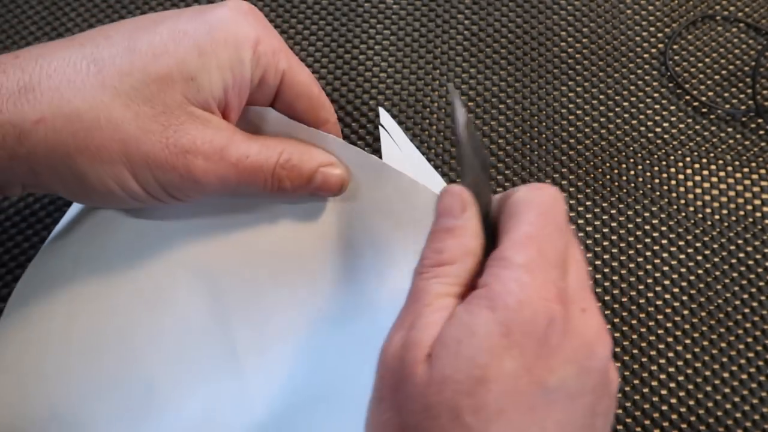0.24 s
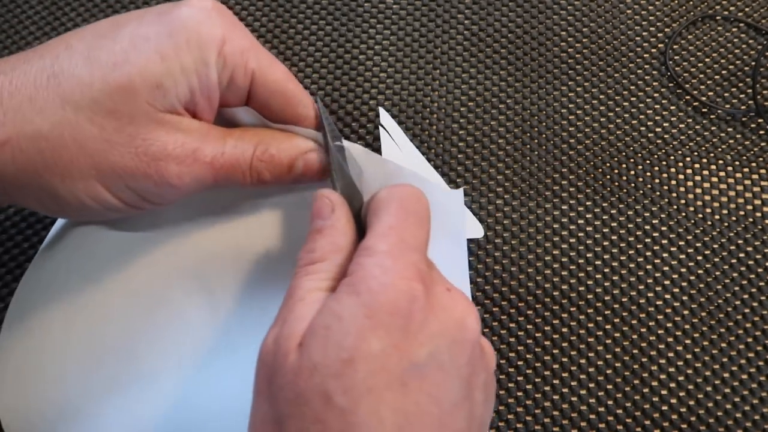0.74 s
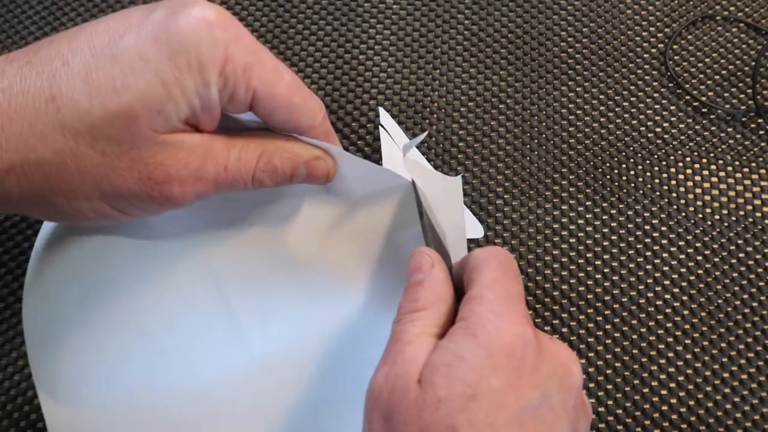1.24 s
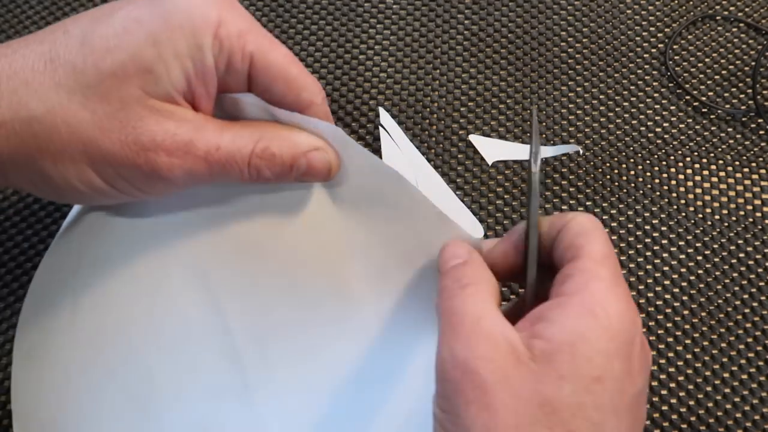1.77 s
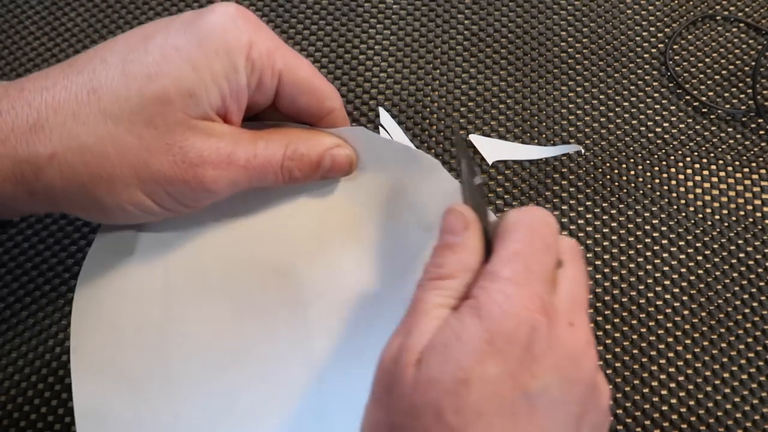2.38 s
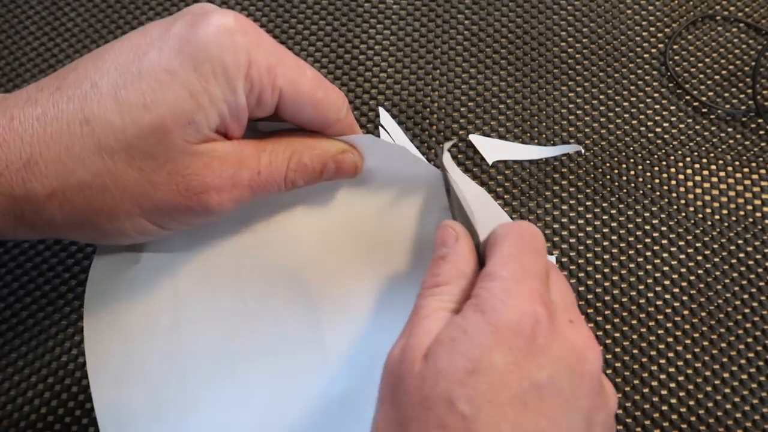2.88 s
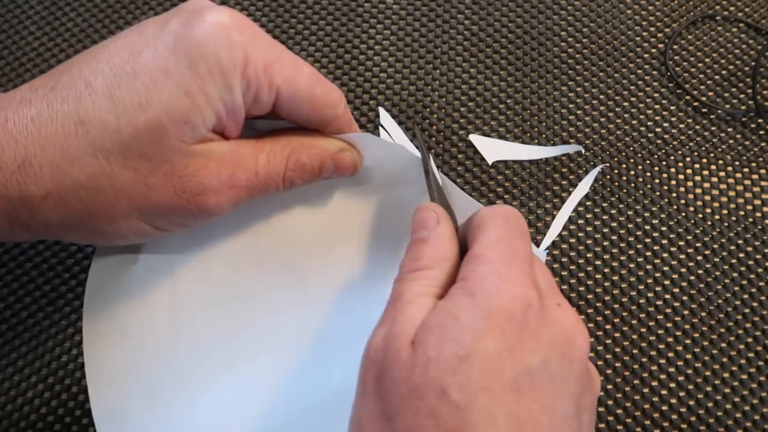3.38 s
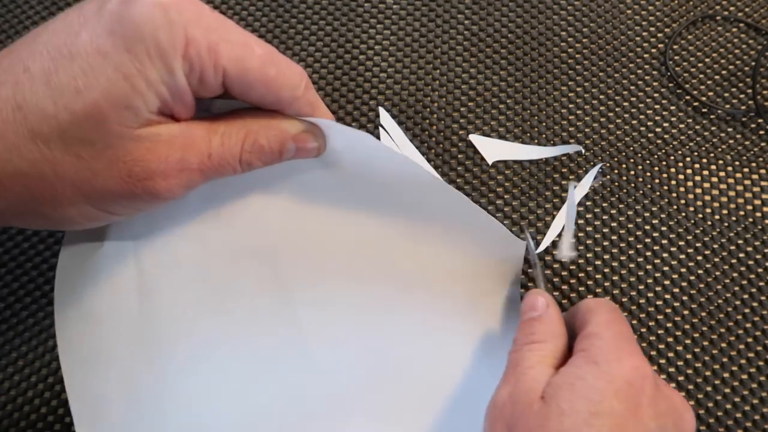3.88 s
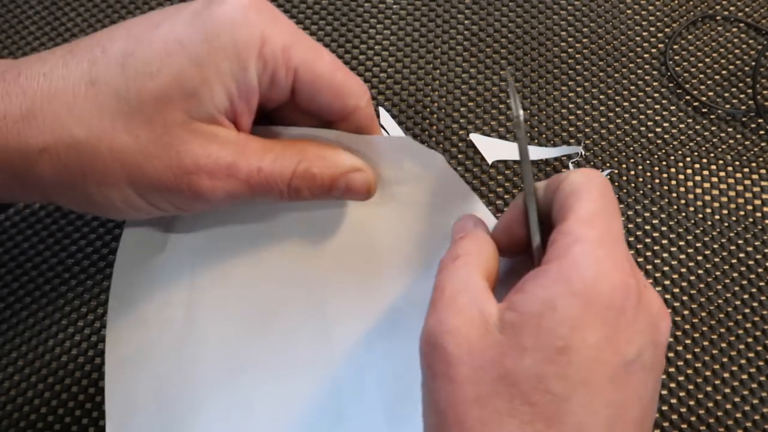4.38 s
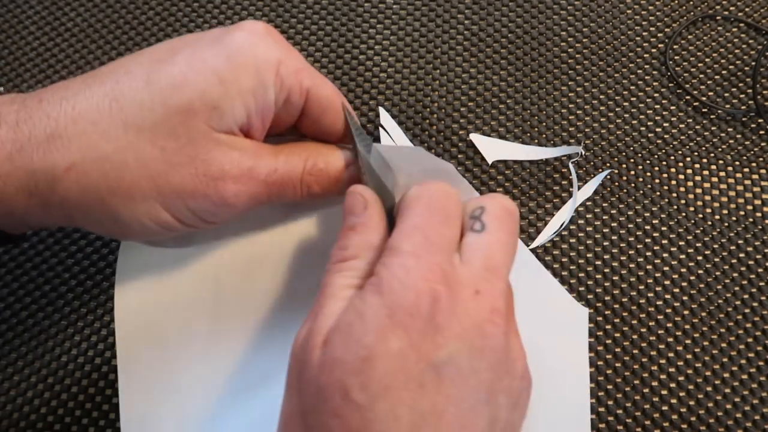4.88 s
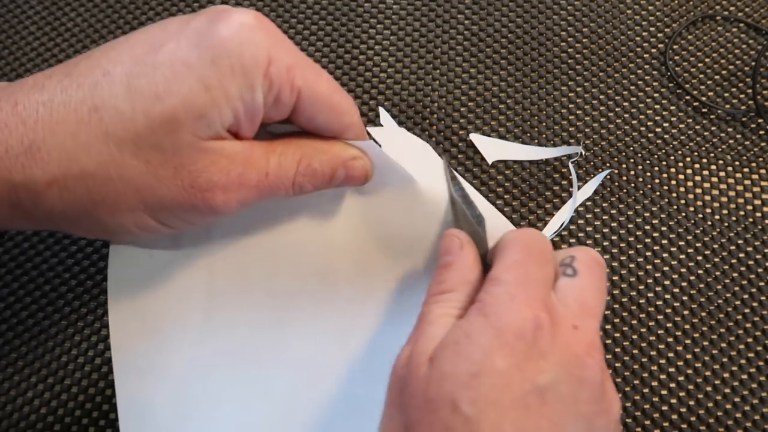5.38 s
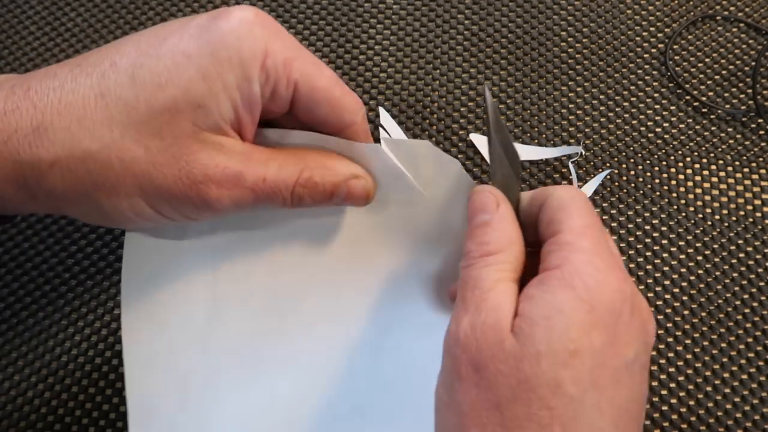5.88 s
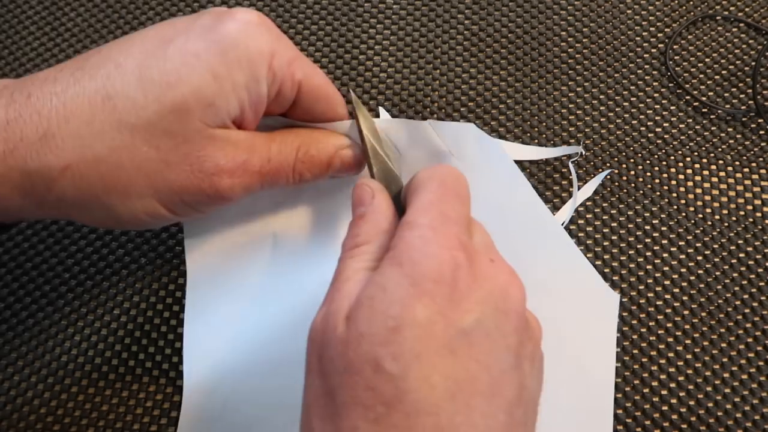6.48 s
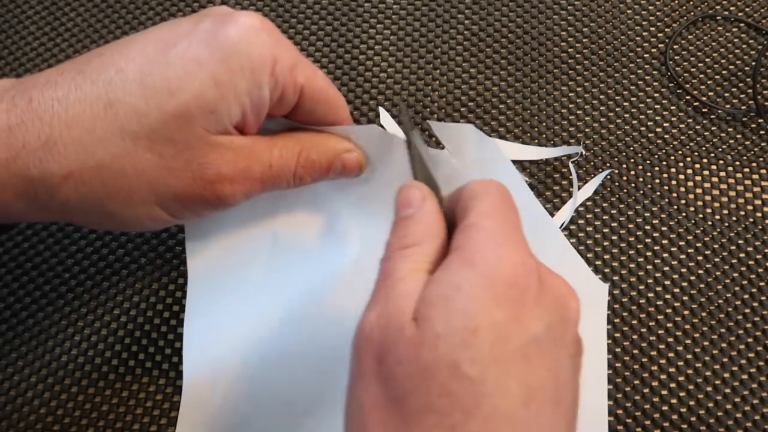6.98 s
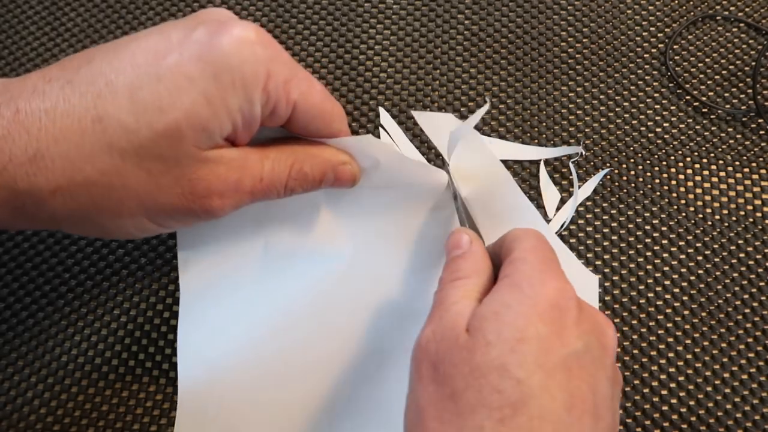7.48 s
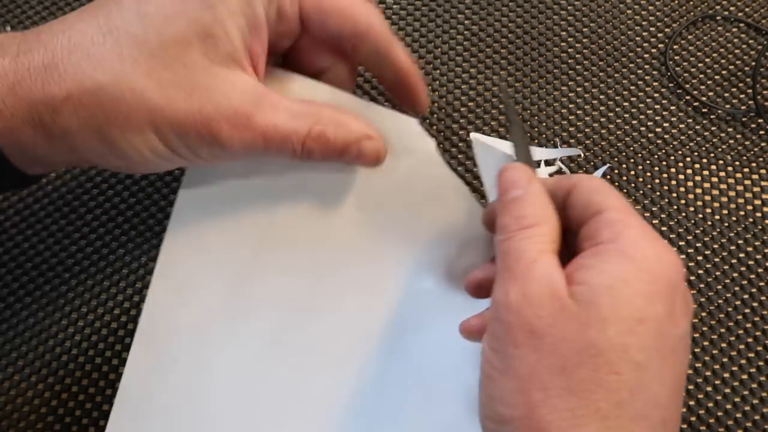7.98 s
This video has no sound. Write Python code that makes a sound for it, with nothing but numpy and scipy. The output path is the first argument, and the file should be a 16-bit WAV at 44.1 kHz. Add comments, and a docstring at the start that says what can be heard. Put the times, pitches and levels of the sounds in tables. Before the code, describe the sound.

Paper handled gently, then sliced by a keen blade: a long rasping cut, a pause with rustles, two quick cuts, more handling, a weaker halting cut, then two brighter strokes close together. Sharp ticks and small rips mark the strips coming free. Dry, intimate close pickup, nearly centred, with barely audible room reflections and low hum-like noise.

```python
"""Knife slicing paper

In a small workshop, close to the microphone, a sharp knife slices strips off a hand-held sheet in six strokes.
The edge snaps thousands of fibres a second: random grains, filtered by the resonances of the sheet.
The hands shift their grip, so the sheet rustles in looser grains, and flops and cracks in filtered bursts.
Behind it lie faint room reflections and a low room tone."""
import sys
import numpy as np
from scipy import signal
from scipy.fft import rfft, irfft
from scipy.io import wavfile
from scipy.ndimage import uniform_filter1d

SR = 44100
rng = np.random.default_rng(int(sys.argv[2]) if len(sys.argv) > 2 else 0)


def unload_wav(signal):
    """Save mono or channel-first audio to the path in sys.argv[1] as 16-bit WAV at rate SR, clipped to [-1, 1]."""
    wavfile.write(
        sys.argv[1],
        SR,
        np.round(np.clip(np.atleast_2d(signal).T, -1, 1) * 32767).astype(np.int16),
    )


N = 363384
TIME = np.arange(N) / SR
HZ = np.fft.rfftfreq(4096, 1 / SR)  # the frequencies at which filters are drawn


# Pushes of the blade, grouped by the strip they cut off. Each row: start in seconds, length in seconds,
# time to full force in seconds, force at entry in dB below full (negative: above it), ring of the sheet at
# full force in dB, sag after that in dB per second (negative: growth), bite over ring in dB, fizz over ring in dB.
STROKES = [
    [(0.822, 0.33, 0.16, 14, -27, 55, -1.5, -16), (1.15, 0.413, 0.9, 6.5, -32, 1, 3.5, -7.5)],
    [(2.686, 0.45, 0.28, 25.5, -29.5, -1, 1, -12)],
    [(3.481, 0.5045, 0.18, 8.5, -28, 1.5, 1, -12)],
    [(5.025, 0.11, 0.03, 11, -37.5, 5, -2, -11), (5.14, 0.2, 0.14, 13, -36.5, 17, 2.5, -6),
     (5.35, 0.241, 0.052, -9, -37.5, 34, 0.5, -4.5)],
    [(6.512, 0.18, 0.15, 16.5, -31, 5, 3.5, -14.5), (6.706, 0.12, 0.057, 4, -22.5, 15, 0.5, -16),
     (6.845, 0.079, 0.048, 13, -33, 5, -3.5, -10.5), (6.955, 0.074, 0.034, 22, -44, 35, 6, -8)],
    [(7.2, 0.096, 0.029, 11, -27, 17, -3.5, -16), (7.266, 0.311, 0.2, 8.5, -21.5, 55, 2, -16)],
]
# The strip that peels off in each stroke. Each row: upper mode in Hz, its width in Hz, its level in dB,
# lower mode in Hz, its level in dB, flutter in dB relative to the ring of the sheet.
STRIPS = [(3200, 1750, -9.5, 1660, -1.5, -19.5), (3130, 940, -8.5, 1530, -2.5, -17),
          (2900, 870, 0.5, 1580, -1, -16), (3330, 1100, -9, 1590, 2, -15.5),
          (2600, 500, -1.5, 1510, -2, -15.5), (2550, 520, 1, 1500, 6.5, -16)]
STRIP_LOW_WIDTH_HZ = 240
CUT_DRIFT_DB, FIZZ_DRIFT_DB = 4, 3  # depth of the peaks and dips that come with bending
BITE_FOLLOWS, FIZZ_FOLLOWS = 1.03, 0.51  # dB per dB of force
BITE_DB_PER_S, FIZZ_DB_PER_S = 3.5, 18.5  # a push gets brighter as the cut lengthens
FIZZ_DIES_DB_PER_S = 62  # once the edge is out, the fizz dies before the rest


def slicing():
    """The edge parts fibres: they ring the sheet, rasp at the edge, and shake the loose strip."""
    snaps = grains(per_s=8000, spread_db=3.2, clump_db=1.2, clump_rate=60)
    snaps = bend(snaps, depth_db=CUT_DRIFT_DB)
    # now and then a thick fibre gives way with a tick of its own
    snaps = snaps + amp(-12) * grains(per_s=140, spread_db=1.9, clump_db=3, clump_rate=2.5)
    fine = grains(per_s=13000, spread_db=2.5, clump_db=1.65, clump_rate=86)
    fine = bend(fine, depth_db=FIZZ_DRIFT_DB)
    shaken = snaps * amp(3.3 * wander(28))
    # gains of the four bands, from low to high
    flutter = above(190) * below(520)
    ring = above(650) * below(2000)
    bite = above(2000) * below(6000)
    fizz = above(6000)
    out = np.zeros(N)
    for pushes, strip in zip(STROKES, STRIPS):
        hz, width, strip_db, low_hz, low_db, flutter_db = strip
        body = sheet([(hz, width, strip_db), (low_hz, STRIP_LOW_WIDTH_HZ, low_db)])
        for start, length, full_s, entry_db, ring_db, sag_db_per_s, bite_db, fizz_db in pushes:
            span = (TIME >= start) & (TIME < start + length + .3)  # leaves time to settle
            t = TIME[span] - start
            force_db, contact = push(t, length, full_s, entry_db, sag_db_per_s)
            past_middle_s = np.minimum(t, length) - length / 2
            bite_level = bite_db + BITE_FOLLOWS * force_db + BITE_DB_PER_S * past_middle_s
            fizz_level = fizz_db + FIZZ_FOLLOWS * force_db + FIZZ_DB_PER_S * past_middle_s
            fizz_level = fizz_level - FIZZ_DIES_DB_PER_S * np.maximum(t - length, 0)
            layers = [(shaken, flutter, flutter_db + force_db), (snaps, ring, force_db),
                      (snaps, bite, bite_level), (fine, fizz, fizz_level)]
            for drive, band, db in layers:
                sound = evened(colour(drive[span], body * band))
                out[span] += contact * amp(ring_db + db) * sound
    return out


DIG_CURVE = 1.85  # the edge digs in along this power law
CATCH_S, RELEASE_S = 0.005, 0.011  # the edge catches the paper, and leaves it
SETTLE_DB, SETTLE_S = -12, 0.086  # the freed sheet goes on shivering


def push(t, length, full_s, entry_db, sag_db_per_s):
    """One push: force in dB as the edge digs in and slackens, and the gain of its contact with the paper."""
    digging_db = -entry_db * np.clip(1 - t / full_s, 0, 1) ** DIG_CURVE
    sag_db = sag_db_per_s * np.maximum(np.minimum(t, length) - full_s, 0)
    after = np.maximum(t - length, 0)
    leaving = np.maximum(np.exp(-after / RELEASE_S), amp(SETTLE_DB) * np.exp(-after / SETTLE_S))
    return digging_db - sag_db, np.minimum(t / CATCH_S, 1) * leaving


# Resonances of the held sheet. Each row: frequency in Hz, width in Hz, level in dB.
SHEET = [(388, 203, -6.5), (931, 181, 0.5), (1543, 375, 1), (2560, 900, -8), (3850, 650, -13),
         (4740, 880, -20), (5840, 160, -18.5)]
# Direct sound of the fibres. Each row: frequency in Hz, gain in dB.
FIBRES = [(60, -55), (200, -13.5), (600, -36.5), (2000, -29), (4000, -18.5), (7000, -28.5), (10300, -31),
          (13000, -36), (14700, -46), (15700, -82)]


def sheet(strip=()):
    """Gain from edge to air: broad resonances of the paper over the direct sound of its fibres."""
    power = amp(read(FIBRES)) ** 2
    for hz, width, db in [*SHEET, *strip]:
        offset = (HZ - hz) / width * 4 / 3
        power = power + amp(db) ** 2 / (1 + offset ** 2) ** 2
    return np.sqrt(power)


# The hands bend the sheet and it rustles. Each row: start in seconds, length in seconds, level in dB.
FLEXES = [(0.0, 0.1, -37.5), (0.14, 0.08, -33.5), (0.24, 0.17, -42.5), (0.7, 0.052, -41),
          (1.865, 0.05, -38.5), (1.917, 0.1, -35.5), (2.075, 0.032, -33), (2.145, 0.027, -35),
          (2.21, 0.052, -32), (2.32, 0.16, -44.5), (2.66, 0.045, -46), (4.0, 0.19, -44.5),
          (4.42, 0.033, -30), (4.52, 0.3, -42), (4.648, 0.016, -29), (4.73, 0.15, -49),
          (5.61, 0.023, -35.5), (5.96, 0.19, -41), (6.1, 0.038, -29), (6.18, 0.24, -43),
          (7.56, 0.083, -33.5), (7.715, 0.22, -39), (7.97, 0.13, -32), (8.13, 0.15, -46)]
# Course of a flex: attack in seconds, fade over its length in dB, release in seconds.
FLEX_SHAPE = (0.0087, -6.5, 0.048)
# Colour of the rustle on top of the sheet's own. Each row: frequency in Hz, gain in dB.
RUSTLE = [(50, 9), (120, 9.5), (250, 3.5), (450, 1), (900, -2.5), (1500, -8.5), (2400, -11.5),
          (4000, -14.5), (8000, -14.5)]
# Fingers slide over the sheet. Each row: start in seconds, length in seconds, level below 6 kHz in dB,
# hiss above 6 kHz relative to that in dB.
SLIDES = [(0.033, 0.39, -45.5, -11), (0.585, 0.12, -50, -12.5), (0.7, 0.19, -42.5, -9.5),
          (1.557, 0.17, -39, -17), (1.894, 0.33, -41, -6.5), (2.26, 0.19, -40.5, -13),
          (3.145, 0.13, -52.5, -31), (3.982, 0.3, -44, -11), (4.32, 0.12, -47, -14), (4.4, 0.56, -45, -7),
          (4.747, 0.14, -62, -27), (4.944, 0.072, -45, -19), (5.823, 0.17, -47, -16),
          (5.948, 0.23, -38.5, -8.5), (6.2, 0.19, -45.5, -14), (7.708, 0.12, -31, -8),
          (7.827, 0.24, -42.5, -15.5), (7.957, 0.14, -30.5, -7), (8.096, 0.29, -44, -4.5)]
# Course of a slide: attack in seconds, fade over its length in dB, release in seconds.
SLIDE_SHAPE = (0.055, -6, 0.016)
# Colour of skin on paper. Each row: frequency in Hz, gain in dB.
SLIDE = [(700, -39), (1800, 6), (3000, 6), (4500, -1), (7000, -13), (10000, -18), (13000, -23.5),
         (15500, -42)]


def handling():
    """The sheet crinkles in loose clumps, with a few separate ticks, while skin slides over it."""
    crinkles = bend(grains(per_s=750, spread_db=-1.5, clump_db=1.0, clump_rate=40), depth_db=5.5)
    crinkles = crinkles + amp(2) * grains(per_s=60, spread_db=1.5, clump_db=2.5, clump_rate=7.8)
    rustle = evened(colour(crinkles, sheet() * amp(read(RUSTLE))))
    friction = bend(grains(per_s=7600, spread_db=1.5, clump_db=1.75, clump_rate=37), depth_db=3)
    skin = amp(read(SLIDE))
    rub = evened(colour(friction, skin * below(6000)))
    hiss = evened(colour(friction, skin * above(6000)))
    rub_rows = [(s, length, db) for s, length, db, _ in SLIDES]
    hiss_rows = [(s, length, db + hiss_db) for s, length, db, hiss_db in SLIDES]
    sliding = moves(rub_rows, *SLIDE_SHAPE) * rub + moves(hiss_rows, *SLIDE_SHAPE) * hiss
    return moves(FLEXES, *FLEX_SHAPE) * rustle + sliding


def moves(rows, attack_s, fade_db, release_s):
    """Gain through time of hand movements: each rises, loses strength and stops; overlaps add in power."""
    power, t = np.zeros(N), TIME[:SR]
    for start, length, db in rows:
        gate = np.minimum(t / attack_s, 1) * np.exp(-np.maximum(t - length, 0) / release_s)
        fading = amp(db + fade_db * np.minimum(t / length, 1))
        add(power, start, (gate * fading) ** 2)
    return np.sqrt(power)


# A run of fibres rips or creases at once. Each row: start in seconds, level before its swell in dB,
# resonance in Hz, length in seconds.
RIPS = [(0.92, -30, 1500, 0.028), (1.506, -17, 2750, 0.028), (1.554, -17.5, 2010, 0.0082),
        (3.473, -43, 1640, 0.014), (3.913, -26, 5000, 0.032), (3.942, -17, 4460, 0.029),
        (3.961, -18, 990, 0.014), (3.976, -20.5, 3180, 0.012), (4.941, -30.5, 3530, 0.014),
        (4.953, -33.5, 1910, 0.023), (5.359, -27, 1430, 0.0073), (5.393, -27.5, 1350, 0.031),
        (5.599, -29, 1210, 0.013), (6.131, -22.5, 1660, 0.0098), (6.51, -34.5, 2280, 0.01),
        (7.711, -32, 1500, 0.0096), (7.725, -16, 3080, 0.03), (7.778, -27.5, 2210, 0.012),
        (7.972, -34, 1570, 0.013)]


def rips():
    """Short dense runs of breaking fibres, each ringing its own small patch of paper."""
    out, t = np.zeros(N), np.arange(4096) / SR
    for (s, db, hz, length), noise in zip(RIPS, rng.standard_normal((len(RIPS), len(t)))):
        swell = np.sin(np.pi * np.minimum(t / length, 1) ** 0.54).clip(0) ** 0.72
        patch = sheet([(hz, hz / 3, 5)])
        add(out, s, amp(db) * swell * evened(colour(noise, patch)))
    return out


# The sheet buckles with a crack. Each row: start in seconds, peak level in dB, brightness in Hz.
CRACKS = [(0.1397, -18, 1510), (0.9321, -11, 1530), (1.5198, -6, 2070), (1.531, -6, 2540),
          (2.8177, -9, 2430), (3.7935, -6, 1430), (4.441, -14, 1280), (4.6881, -13, 1980),
          (4.7158, -9, 3310), (5.3631, -15, 1460), (6.0023, -13, 1720), (6.1346, -13, 1470),
          (6.7054, -3, 1820), (6.8257, -8, 1400), (7.6217, -14, 1080), (8.0316, -10, 2220)]
CRACK_DECAY_S = 0.0015


def cracks():
    """Stiff folds of the sheet snap over sharply, all with the same short decay."""
    rows = [(*row, CRACK_DECAY_S) for row in CRACKS]
    return buckles(rows, slope_db=8.5, crackle=0.27, after_db=-19.5, after_s=0.006)


# The sheet flops over softly. Each row: start in seconds, peak level in dB, brightness in Hz, decay in seconds.
FLOPS = [(0.0204, -30.5, 610, 0.0039), (0.1669, -21, 1160, 0.0034), (0.5526, -23.5, 820, 0.0099),
         (1.7794, -26, 450, 0.0042), (1.8261, -28.5, 1102, 0.017), (1.9282, -15, 980, 0.014),
         (1.9475, -22, 925, 0.0064), (2.1633, -21, 895, 0.003), (2.511, -35, 443, 0.002),
         (2.2624, -21, 1020, 0.0056), (2.6519, -31.5, 1070, 0.0043), (3.2862, -30.5, 810, 0.0041),
         (4.3399, -26, 1020, 0.0039), (4.4134, -27, 1130, 0.019), (4.4477, -23, 1190, 0.016),
         (4.6677, -15, 1330, 0.0051), (6.05, -26, 1240, 0.018), (6.1509, -21, 1480, 0.0019),
         (6.633, -14, 1590, 0.0023), (6.6567, -21, 1250, 0.0054), (8.1438, -24.5, 1350, 0.012)]


def flops():
    """Loose folds turn over softly, with a longer shiver than the cracks."""
    return buckles(FLOPS, slope_db=9.0, crackle=0.32, after_db=-17.5, after_s=0.042)


def buckles(rows, slope_db, crackle, after_db, after_s):
    """A fold pops through: one click, a decaying crackle, and a faint shiver of the sheet."""
    out, t = np.zeros(N), np.arange(4096) / SR
    for (s, db, hz, decay), noise in zip(rows, rng.standard_normal((len(rows), len(t)))):
        shiver = amp(after_db) * np.exp(-t / after_s)
        burst = crackle * noise * (np.exp(-t / max(decay, 1e-4)) + shiver)
        burst[0] += 1  # the click
        pop = tilted(burst, hz, slope_db)
        add(out, s, amp(db) * pop / abs(pop).max())
    return out


def tilted(x, hz, slope_db):
    """Sends a burst through the sheet; a tighter fold (higher hz) tips the sound towards the treble."""
    octaves = np.log2(np.clip(HZ, 500, 4500) / 1500)
    softened = 1 / np.sqrt(1 + (HZ / 8000) ** 4)
    tilt = amp(slope_db * np.log2(max(hz, 100) / 1500) * octaves)
    return colour(x, sheet() * above(114) * softened * tilt)


# Stereo width of the near sheet. Each row: frequency in Hz, side over mid in dB.
WIDTH = [(60, -29), (250, -26.5), (620, -31), (900, -56), (1300, -42), (1750, -24.5), (2100, -15.5),
         (2800, -24), (4500, -7.5), (7500, -2.5)]


def spread(x):
    """Side signal of the near sheet: smoothly scattered phases, faint in the middle range, wider in the treble."""
    z = signal.stft(x, nperseg=256)[2]
    chance = rng.standard_normal((2,) + z.shape)
    re, im = uniform_filter1d(uniform_filter1d(chance, size=5, axis=1), size=7, axis=2)
    scattered = signal.istft(z * np.exp(1j * np.arctan2(im, re)), nperseg=256)[1][:N]
    return colour(scattered, amp(read(WIDTH)))


# Decay of the workshop. Each row: frequency in Hz, time to fall by 60 dB in seconds.
ROOM_T60 = [(150, 1), (1000, 0.17), (4000, 1), (14000, 0.089)]


def workshop(x):
    """A short tail of sparse reflections, each frequency dying at its own pace, the top treble fastest."""
    count = SR // 2
    echoes = rng.random(count) < 3000 / SR
    taps = rng.standard_normal(count) * echoes * (TIME[:count] > .004)  # none in the first 4 ms
    hz, t, z = signal.stft(taps, SR, nperseg=256)
    decay = amp(-60 * t / read(ROOM_T60, hz)[:, None])
    tail = signal.istft(z * decay, SR, nperseg=256)[1]
    return signal.oaconvolve(x, tail / np.linalg.norm(tail))[:N]


# Spectrum of the empty room. Each row: frequency in Hz, relative level in dB.
ROOM_TONE = [(15, -49), (25, -3), (99, 4.5), (289, -1), (378, -2), (482, -5.5), (537, -4.5), (614, -9),
             (666, -9), (722, -9.5), (2230, -12.5), (6730, -25), (12500, -35.5), (15500, -45)]
ROOM_TONE_DB = -50


def room_tone():
    """Steady low rumble and faint hiss of the room, as filtered noise."""
    return amp(ROOM_TONE_DB) * evened(colour(rng.standard_normal(N), amp(read(ROOM_TONE))))


def grains(per_s, spread_db, clump_db, clump_rate):
    """Tiny snaps of varied size and either sign at random moments, swelling and thinning in clumps."""
    size = amp(spread_db * np.minimum(rng.exponential(1, N), 4)) * rng.choice([-1, 1], N)
    struck = rng.random(N) < per_s / SR
    return evened(size * struck * amp(clump_db * wander(clump_rate)))


def bend(x, depth_db):
    """As the sheet bends, narrow peaks and dips drift through its sound; short waves feel it most."""
    hz, _, z = signal.stft(x, SR, nperseg=1024)
    patches = rng.standard_normal(z.shape)
    for _ in range(2):
        patches = uniform_filter1d(uniform_filter1d(patches, size=3, axis=0), size=8, axis=1)
    reach = np.sqrt(hz / (hz + 1200))[:, None]
    return signal.istft(z * amp(depth_db * reach * evened(patches)), nperseg=1024)[1][:N]


def wander(rate):
    """Smooth chance of rms 1 that changes about rate times a second."""
    hz = np.fft.rfftfreq(N, 1 / SR)
    return evened(irfft(rfft(rng.standard_normal(N)) / (1 + (hz / rate) ** 4), N))


def colour(x, gain):
    """Causal minimum-phase filter with the given gain at each of HZ: clicks ring forwards only."""
    log_gain = np.log(np.maximum(np.r_[gain, gain[-2:0:-1]], 1e-5))
    taps = np.fft.ifft(np.exp(np.conj(signal.hilbert(log_gain)))).real
    return signal.oaconvolve(x, taps[:len(HZ)])[:len(x)]


def below(hz):
    """Gain of a steep low-pass; its square and that of above() sum to 1."""
    return 1 / np.sqrt(1 + (HZ / hz) ** 10)


def above(hz):
    """Gain of a steep high-pass."""
    return np.sqrt(1 - below(hz) ** 2)


def read(points, hz=HZ):
    """Reads a spectrum on a log-frequency axis."""
    f, value = np.transpose(points)
    return np.interp(np.log(hz + 1), np.log(f + 1), value)


def amp(db):
    """Decibels to gain."""
    return 10 ** (np.asarray(db) / 20)


def evened(x):
    """Scales to an rms of 1."""
    return x / np.sqrt(np.mean(x ** 2) + 1e-20)


def add(mix, s, sound):
    """Mixes a sound in at time s."""
    part = mix[max(round(s * SR), 0):][:len(sound)]
    part += sound[:len(part)]


# Stereo width of the room. Each row: frequency in Hz, side over mid in dB.
DIFFUSE = [(50, -31), (150, -13), (350, -4.5), (1000, -4.5)]


def scene():
    """Paper sounds near the centre; their reflections and the room tone come from all round."""
    paper = slicing() + handling() + rips() + cracks() + flops()
    # two independent draws of the room, for mid and side
    room_mid, room_side = (amp(-32) * workshop(paper) + room_tone() for _ in range(2))
    mid = paper + room_mid
    side = spread(paper) + colour(room_side, amp(read(DIFFUSE)))
    return np.array([mid + side, mid - side])


EDGE_HZ = 15500


def record(dry):
    """The recorder's band limit: a steep low-pass."""
    taps = signal.firwin(255, EDGE_HZ, window=("kaiser", 9), fs=SR)
    return signal.oaconvolve(dry, taps[None], "same")


dry = scene()
out = record(dry)
unload_wav(out)
```